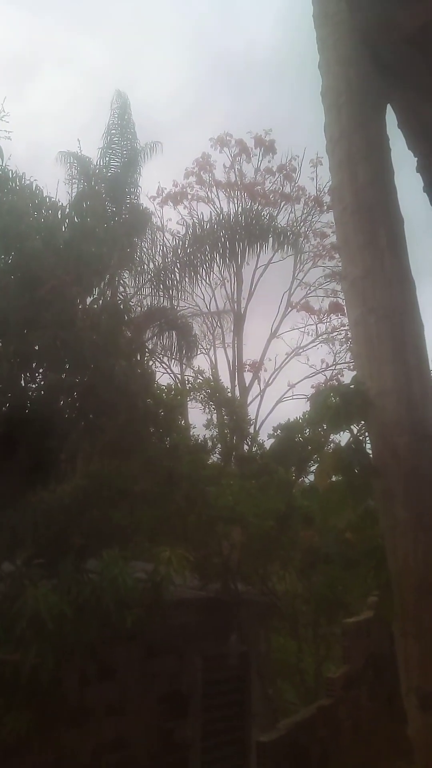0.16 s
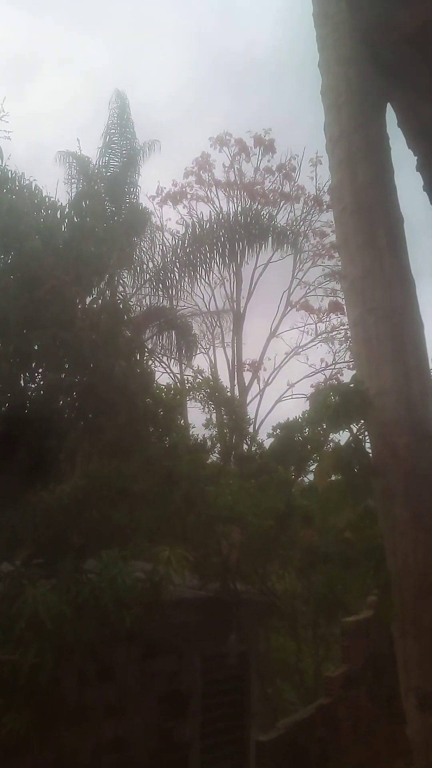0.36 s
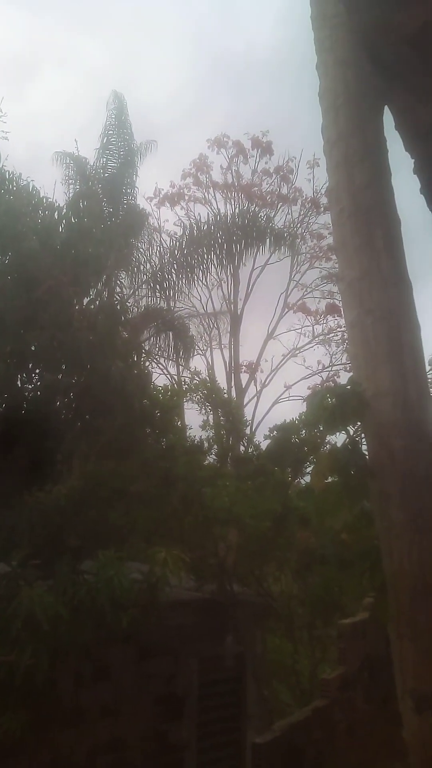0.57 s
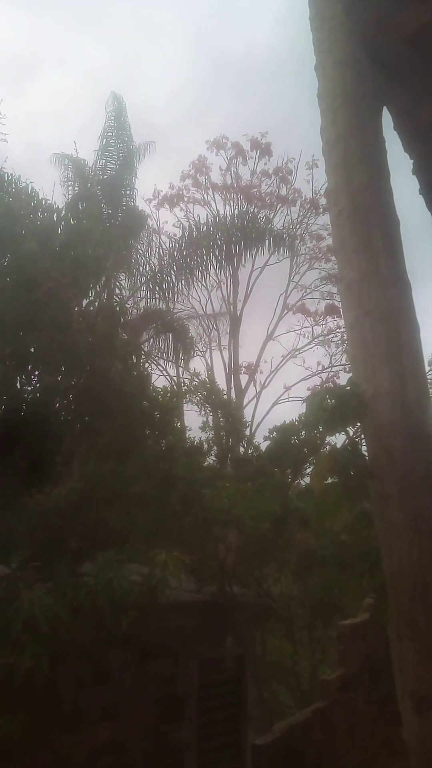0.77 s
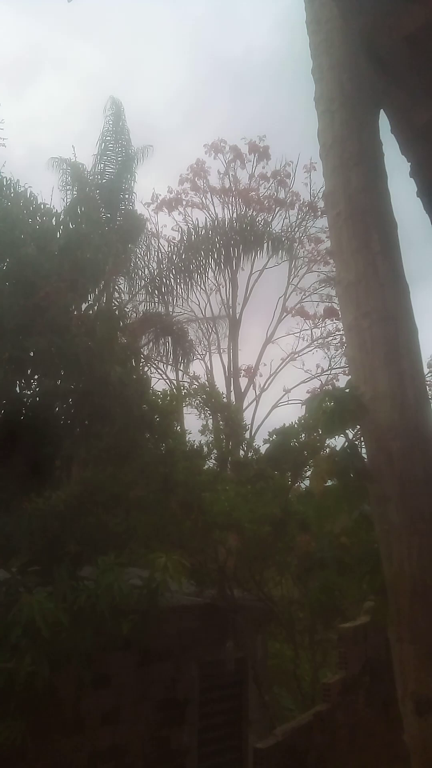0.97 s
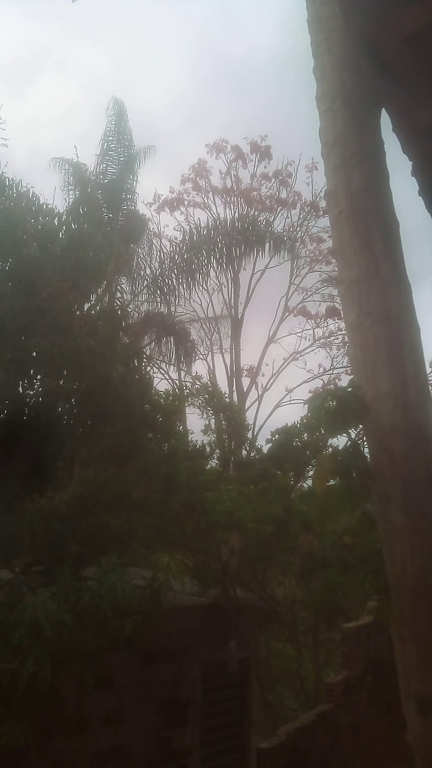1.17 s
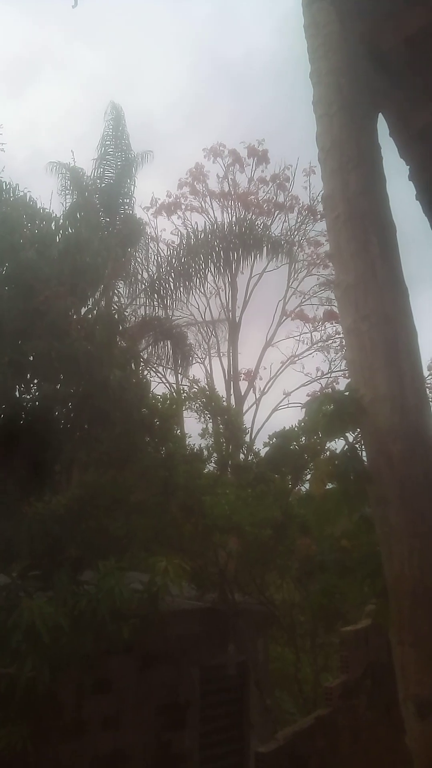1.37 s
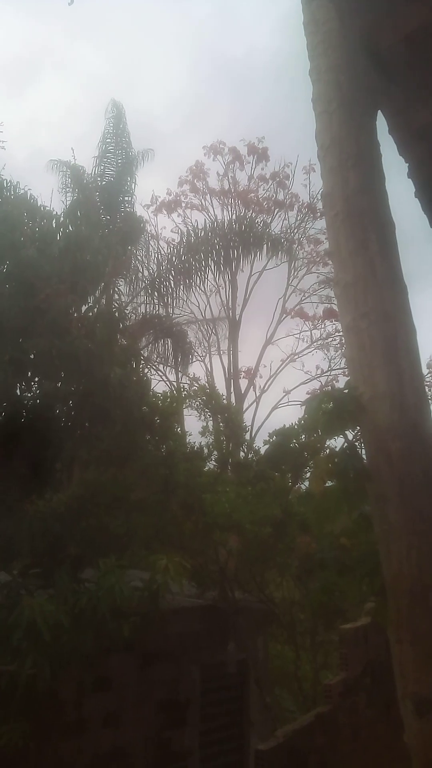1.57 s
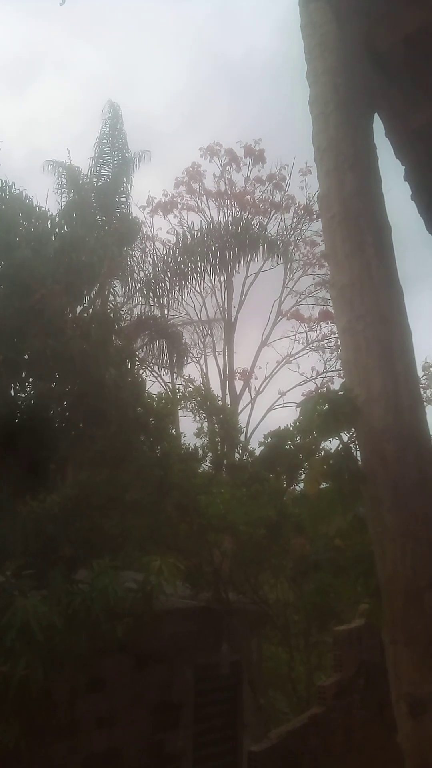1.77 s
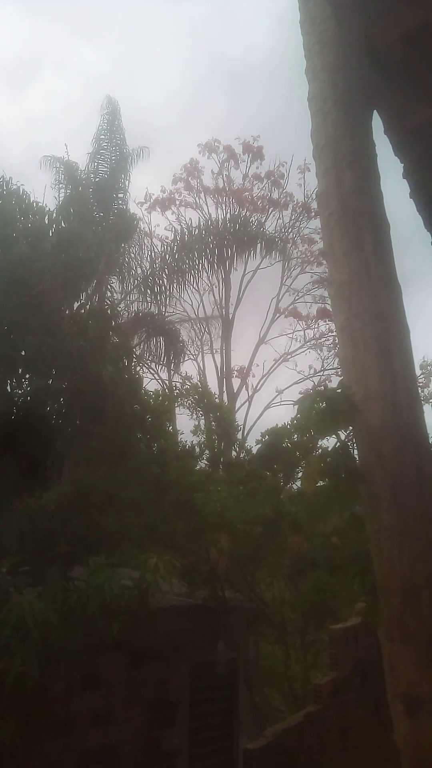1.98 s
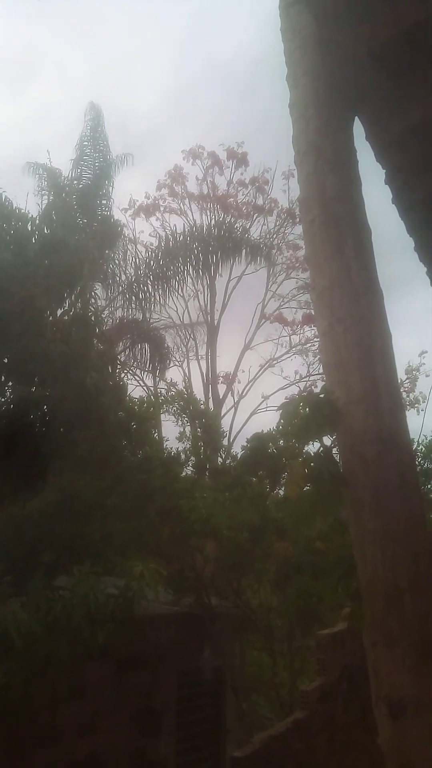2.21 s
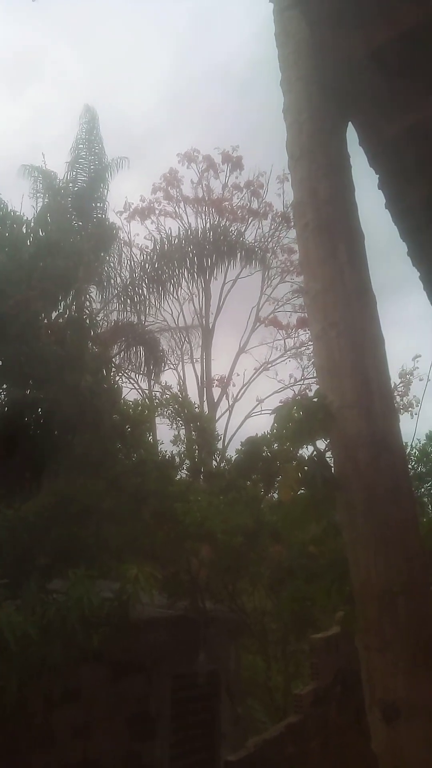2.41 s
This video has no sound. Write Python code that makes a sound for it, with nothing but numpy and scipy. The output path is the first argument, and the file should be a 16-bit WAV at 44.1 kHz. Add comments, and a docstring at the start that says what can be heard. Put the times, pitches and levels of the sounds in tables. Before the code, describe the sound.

A small parrot screeches once, loud and close, from about 0.2 to 0.4 seconds, raspy at its edges with a brief echo. From 0.6 to 1.4 seconds, other parrots answer from the trees with about seven softer, short, hoarse calls, the last ones lower. Faint low bird whistles follow near 2 and 2.4 seconds. Quiet insect hiss and distant rumble continue throughout, with a few thin chips and dry ticks.

```python
"""A small parrot screeches once close by in a garden: its syrinx gives a harmonic tone and pulsed air,
which the resonances of throat and beak filter. Others answer more softly from the trees, smeared by
multiple scattering in the foliage. Insects hiss and trill over a distant rumble; thin chips, low whistles,
a far drawn-out hoot and a few dry ticks lie behind the parrots."""
import sys
import numpy as np
from scipy import signal
from scipy.fft import rfft, irfft
from scipy.io import wavfile

SR = 44100
rng = np.random.default_rng(int(sys.argv[2]) if len(sys.argv) > 2 else 0)


def dump(signal):
    """Clip the signal to [-1, 1] and save it as 16-bit WAV at the path in sys.argv[1]."""
    limited = np.clip(np.atleast_2d(signal).T, -1, 1)
    pcm = np.round(limited * 32767).astype(np.int16)
    wavfile.write(sys.argv[1], SR, pcm)


N = 108045
T = np.arange(N) / SR

# Levels in the tables are relative; roughness is 0 for a clear voice.
# spectrum of the distant rumble and hiss: f/Hz, level/dB
RUMBLE_SPECTRUM = [(20, -42), (35, -7.5), (55, 0), (110, -0.5), (200, -4.5), (400, -2.5), (800, -5.5),
                   (1300, -11.5), (2400, -7), (3500, -10), (5500, -29), (7000, -25), (8200, -28),
                   (15500, -23)]
# spectrum of the insect hiss: f/Hz, level/dB
INSECT_SPECTRUM = [(3300, -33), (4000, -11.5), (4450, -1.5), (4750, -1.5), (5100, -9), (5600, -20.5),
                   (6500, -34.5)]
# high trills: onset t/s, f/Hz, level/dB, pulse rate/Hz, group rate/Hz
CRICKET_TRILLS = [(2.02, 8770, -83.5, 28, 0), (.8, 9920, -84.5, 25, 5.8)]
# dry ticks: t/s, peak level/dB, centre f/Hz
DRY_TICKS = [(0.5218, -47, 11550), (0.55, -37.5, 11600), (0.602, -45.5, 7900), (1.118, -38, 11500),
             (1.949, -49.5, 9700), (2.039, -41.5, 4020)]
# contour of the far hoot: t/s, f/Hz, level/dB
HOOT_CONTOUR = [(1.1, 424, -74), (1.22, 433.6, -67.5), (1.38, 436, -63.5), (1.58, 428.6, -65.5),
                (1.8, 413.3, -66), (1.92, 405, -76)]
# low whistles, one contour each: t/s, f/Hz, level/dB
WHISTLE_CONTOURS = [
    [(.89, 880, -76), (.95, 862, -68.5), (1.03, 817, -67.5)],
    [(1.31, 849, -71), (1.38, 899, -60.5), (1.43, 875, -73)],
    [(1.975, 850, -89), (1.992, 870, -58), (2.02, 904, -56), (2.062, 860, -53.5), (2.095, 807, -64),
     (2.12, 813, -69)],
    [(2.333, 805, -72), (2.343, 896, -56.5), (2.354, 1096, -64), (2.372, 950, -58), (2.386, 887, -51),
     (2.398, 854, -80)],
]
# thin high chips, one contour each: t/s, f/Hz, level/dB
CHIP_CONTOURS = [
    [(.11, 8200, -83), (.135, 8050, -67), (.19, 7900, -65.5)],
    [(.925, 7830, -62), (.95, 7600, -72), (.99, 7740, -78)],
    [(1.615, 9580, -75), (1.635, 8420, -62), (1.647, 7530, -59), (1.668, 6800, -67), (1.682, 6300, -84)],
]
# answers: onset t/s, duration/s, mid-call f/Hz, level/dB, roughness, fractional pitch fall/(1/s)
ANSWER_CALLS = [(-.22, 0.17, 738.6, -45.5, 0.43, 0.45), (.576, .12, 767, -44.5, 0.64, 0.99),
                (0.694, 0.072, 807, -45, 0.61, -0.51), (0.763, 0.072, 740.6, -46, 0.17, .6),
                (.996, .13, 749.5, -45, 0.59, 1.1), (1.12, .069, 777, -44, 0.64, 0.83),
                (1.226, .1, 587.6, -51.5, 0.69, 0.544), (1.317, .09, 463.3, -49, 1.23, 0.66),
                (2.171, .11, 621.5, -63, 0.5, .5)]
# throat response of the far parrots as heard through leaves: f/Hz, gain/dB
FAR_TRACT = [(700, -32.5), (1400, -35), (1900, -12), (2600, -16), (3050, -15.5), (3500, -14.5),
             (4500, -15.5), (5500, -24), (7200, -19.5), (8200, -41), (10000, -43.5)]
# contour of the near screech: t/s, fundamental f/Hz, level/dB, roughness
SCREECH_CONTOUR = [(.168, 450, -47, .7), (.182, 500, -43, .5), (.188, 549, -34.5, .4),
                   (.203, 618, -34, .75), (.213, 664, -30, .45), (.226, 714, -27.5, .15),
                   (.258, 715, -25.8, 0), (.284, 707, -25.8, .02), (.31, 720, -25.4, .05),
                   (.338, 684, -26, .14), (.353, 660, -30, .22), (.361, 560, -28, .55),
                   (.368, 500, -35, .6), (.383, 485, -45.5, .6)]
# throat and beak response of the near parrot: f/Hz, gain/dB
NEAR_TRACT = [(500, -36), (715, -36.5), (1080, -23.5), (1430, -22), (1700, -27.5), (2130, -17), (2850, -14),
              (3200, -5.5), (3570, -18), (4300, -19.5), (5000, -17.5), (5750, -20), (6450, -18.5),
              (7200, -25), (7900, -30), (8700, -45.5), (10000, -53.5), (12000, -44), (15000, -44.5)]
# colour of the screech as the garden throws it back: f/Hz, gain/dB
BACKSCATTER = [(700, 18), (1400, 9), (2100, 13), (2850, 0.5), (3600, 11), (7000, 10), (12000, 13)]

NEAR_T60_S, GARDEN_T60_S, TREES_T60_S = 0.15, 0.86, 0.89
FOURTH_DB, ODD_DB, FLUTTER_DB, AIR_DB = 14, -2.5, 2, -13
FULL_VOICE_HZ, DULLING_DB = 734, 14  # below this pitch the treble and the air weaken
PITCH_SHAKE, PERIOD_JITTER, SHAKE_PER_S = .018, .005, 450
QUIVER_HZ, QUIVER_DEPTH = 59, 0.013


def undb(db):
    """Amplitude ratio of a level in decibels."""
    return 10 ** (np.asarray(db) / 20)


def unit(x):
    """Normalisation to rms 1."""
    return x / np.sqrt(np.mean(x ** 2))


def gain_at(hz, response):
    """Gain of a response (f/Hz, gain/dB), interpolated in log frequency."""
    f, db = np.array(response).T
    return undb(np.interp(np.log(hz + 1), np.log(f), db))


def colour(x, response):
    """Linear filtering: the spectrum is multiplied by the response."""
    hz = np.arange(N + 1) * SR / (2 * N)
    return irfft(rfft(x, 2 * N) * gain_at(hz, response))[:N]


def wander(per_s):
    """Random modulation of rms 1, interpolated between per_s values a second."""
    knots = np.arange(8192)
    return unit(np.interp(T * per_s, knots, rng.standard_normal(len(knots))))


def follow(contour):
    """Linear interpolation of pitch, gain and further controls; the gain is zero outside the contour."""
    times, *columns = np.array(contour).T
    hz, db, *rest = (np.interp(T, times, column) for column in columns)
    return hz, undb(db) * (T > times[0]) * (T < times[-1]), *rest


def foliage(x, t60_s):
    """Multiple scattering: echoes from leaves and trunks build quickly and decay exponentially."""
    build_up = 1 - np.exp(-T / 0.0059)
    tail = rng.standard_normal(N) * np.exp(-np.log(1000) * T / t60_s) * build_up
    return signal.fftconvolve(x, tail / np.sqrt(np.sum(tail ** 2)))[:len(x)]


def garden():
    """Filtered noise: a narrow, flickering band of insects over a broad distant rumble."""
    insects = unit(colour(rng.standard_normal(N), INSECT_SPECTRUM))
    insects *= undb(-60 + 1.44 * wander(44.88) + 0.16 * wander(2.6))
    rumble = unit(colour(rng.standard_normal(N), RUMBLE_SPECTRUM))
    return insects + rumble * undb(-63 + .5 * wander(5.47))


def crickets():
    """Amplitude modulation of two faint high tones: one trills evenly, the other pulses in groups."""
    out = 0
    for start, hz, db, pulse_hz, group_hz in CRICKET_TRILLS:
        age = np.maximum(T - start, 0)
        pulses = np.sin(np.pi * pulse_hz * age) ** 2 * np.abs(np.cos(np.pi * group_hz * age))
        gain = undb(db + 2 * wander(20))
        carrier = np.sqrt(2) * np.sin(2 * np.pi * hz * T + .5 * wander(pulse_hz * 10))
        out += gain * pulses * carrier
    return out


def ticks(decay_s=0.00018, skirt_db=-38):
    """Brief transients have broad spectra: each noise burst is filtered to its own brightness."""
    out = np.zeros(N)
    for start, db, hz in DRY_TICKS:
        burst = rng.standard_normal(N) * (T >= start) * np.exp(-np.abs(T - start) / decay_s)
        click = colour(burst, [(hz / 4, skirt_db), (hz, 0), (hz * 4, skirt_db)])
        out += undb(db) * click / np.abs(click).max()
    return out


def whistle(contour, waver=0.0095):
    """Slight random frequency modulation makes a pure tone unsteady."""
    hz, gain = follow(contour)
    phase = 2 * np.pi * np.cumsum(hz * (1 + waver * wander(200))) / SR
    return np.sqrt(2) * gain * np.sin(phase)


def other_birds():
    """Direct plus scattered sound of low whistles, high chips and a long wavering hoot."""
    whistles = sum(map(whistle, WHISTLE_CONTOURS))
    chips = sum(map(whistle, CHIP_CONTOURS))
    hoot = whistle(HOOT_CONTOUR, waver=.025) * undb(2.5 * wander(80))
    return (whistles + undb(-10) * foliage(whistles, TREES_T60_S)
            + undb(-6.5) * chips + undb(-3.5) * foliage(chips, t60_s=0.45)
            + undb(-2) * hoot + undb(-7) * foliage(hoot, TREES_T60_S))


def syrinx(hz, roughness, tract, fourth_db):
    """Source and filter: harmonics pass the throat; roughness shakes them and adds pulsed air."""
    dulling_db = DULLING_DB * np.maximum(np.log2(FULL_VOICE_HZ / hz), 0)
    hz = hz * (1 + PITCH_SHAKE * roughness * wander(SHAKE_PER_S) + PERIOD_JITTER * wander(2000))
    phase = 2 * np.pi * np.cumsum(hz) / SR
    tone = 0
    for k in range(1, 25):
        db = ODD_DB * (k % 2) - dulling_db * np.maximum(np.log2(k * hz / 3000), 0)
        # the beak is tuned to the fourth harmonic; the others flutter
        db += fourth_db * (1 - .7 * roughness) if k == 4 else FLUTTER_DB * wander(160)
        tone += undb(db) * gain_at(k * hz, tract) * np.sin(k * phase + rng.uniform(0, 2 * np.pi))
    puffs = rng.standard_normal(N) * (1 + np.cos(phase))
    air = unit(colour(puffs, tract)) * undb(AIR_DB - dulling_db)
    shake = (1 + roughness * wander(SHAKE_PER_S)) / np.sqrt(1 + roughness ** 2)  # keeps the mean power
    return np.sqrt(2) * tone * shake + np.sqrt(np.abs(roughness)) * air


def far_parrots(arch_depth=0.15, edge_s=.022):
    """Reverberation in the trees blurs short hoarse calls; of the first only the decay is heard."""
    lead = SR // 2  # room for a call before t = 0
    calls = np.zeros(2 * N + lead)
    for start, duration, mid_hz, db, roughness, fall in ANSWER_CALLS:
        age = np.minimum(T, duration)
        arch = 1 - arch_depth * (2 * age / duration - 1) ** 4
        quiver = QUIVER_DEPTH * np.cos(2 * np.pi * QUIVER_HZ * T)
        hz = mid_hz * arch * (1 + quiver - fall * (age - duration / 2))
        envelope = np.clip(np.minimum(T, duration - T) / edge_s, 0, 1)
        voice = syrinx(hz, roughness, FAR_TRACT, FOURTH_DB * (1 - roughness / 2))
        onset = lead + int(start * SR)
        calls[onset:onset + N] += undb(db) * envelope * voice
    calls = calls[:N + lead]
    return (calls + foliage(calls, TREES_T60_S))[lead:]


def near_parrot(quiver_crest_s=.26, leaf_stir=.9):
    """Frequency modulation sets a fast quiver on one arched screech, rasping at its ends, clear between."""
    hz, gain, roughness = follow(SCREECH_CONTOUR)
    quiver = 1 + QUIVER_DEPTH * np.cos(2 * np.pi * QUIVER_HZ * (T - quiver_crest_s))
    call = gain * syrinx(hz * quiver, roughness, NEAR_TRACT, FOURTH_DB)
    reflected = colour(call, BACKSCATTER)
    blurred = reflected * (1 + leaf_stir * wander(350))  # the late echo loses its clear pitch
    early_echo = undb(-17) * foliage(reflected, NEAR_T60_S)
    late_echo = undb(-25) * foliage(blurred, GARDEN_T60_S)
    return call + early_echo + late_echo


def scene():
    """Superposition: the birds and the garden add at one listening point."""
    return (near_parrot() + far_parrots() + other_birds() + ticks() + crickets() + garden())[None]


def record(dry):
    """Band limiting: a steep elliptic low-pass removes the treble above 15.5 kHz."""
    return signal.sosfilt(signal.ellip(10, .2, 80, 15500, fs=SR, output="sos"), dry)


dry = scene()
out = record(dry)
dump(out)
```